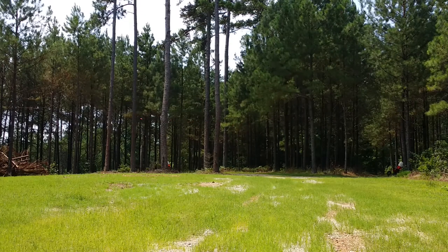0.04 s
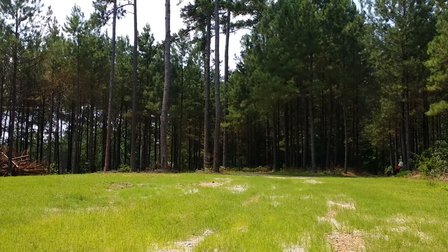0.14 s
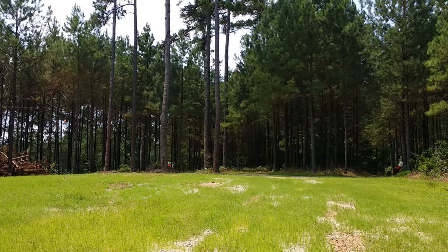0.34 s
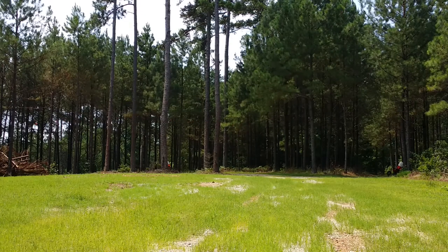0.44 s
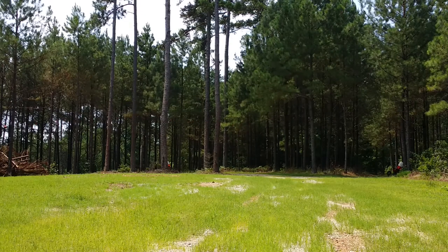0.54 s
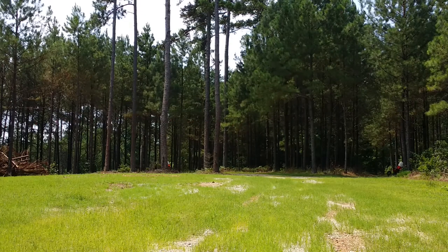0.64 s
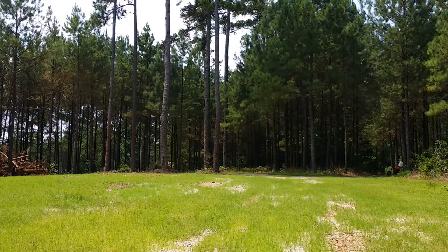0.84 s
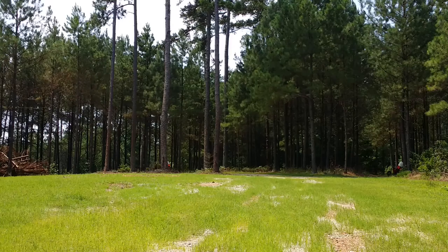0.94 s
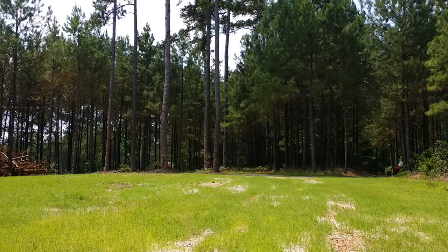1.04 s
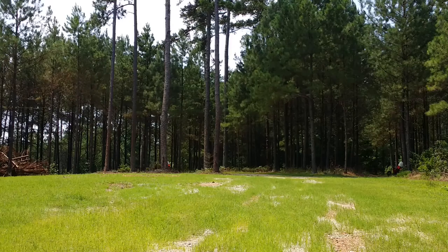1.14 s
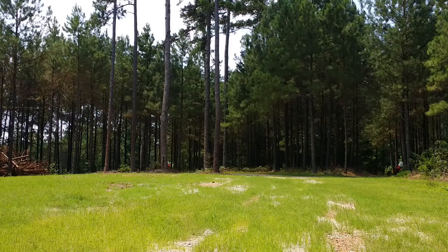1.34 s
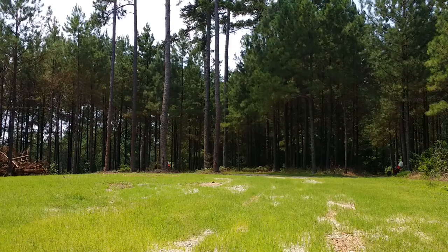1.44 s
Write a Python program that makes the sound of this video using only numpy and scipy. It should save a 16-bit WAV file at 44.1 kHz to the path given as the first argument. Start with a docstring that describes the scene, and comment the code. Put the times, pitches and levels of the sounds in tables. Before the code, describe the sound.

A single loud, close shotgun blast goes off at about 0.2 seconds over low outdoor background noise, a sharp crack with a low boom. A brief metallic clack follows at about 0.35 seconds. The shot echoes off the surrounding trees and fades over roughly a second. Faint crackle comes through from 0.7 seconds, and a few small clicks sound between 1 and 1.5 seconds as the background creeps back.

```python
"""One close shotgun blast in a grass clearing ringed by pines.
The crack comes with a low boom and a push of air. The ground and nearest trees scatter it, trunks
echo it, and a long wash returns from the wood. Metal clacks (probably the gun's action), then faint
crackle and small ticks follow. Gain control turns the outdoor background down at the shot and lets
it creep back while the ticks sound."""
import sys
import numpy as np
from scipy import signal
from scipy.fft import rfft, irfft
from scipy.io import wavfile
from scipy.ndimage import uniform_filter1d, minimum_filter1d

SR = 44100
rng = np.random.default_rng(int(sys.argv[2]) if len(sys.argv) > 2 else 0)


def int16_out(signal):
    """Quantize to a 16-bit WAV file."""
    q = np.round(np.clip(np.atleast_2d(signal).T, -1, 1) * 32767)
    wavfile.write(sys.argv[1], SR, q.astype(np.int16))


N = 66150
T, HZ = np.arange(N) / SR, np.fft.rfftfreq(N, 1 / SR)

# Tone colours of the noises. Each row: frequency in Hz, relative level in dB.
OUTDOOR_COLOUR = [(25, -55.5), (60, -44), (130, -29), (280, -19.5), (520, -15), (740, -18.5), (950, -26),
                  (1800, -28), (2700, -33.5), (3700, -40), (7000, -46), (10000, -60.5), (15000, -67.5)]
CRACK_COLOUR = [(30, -23), (100, -7), (260, -4), (700, -6.5), (1500, -2.5), (4000, -3), (8000, -1.5),
                (15000, -11)]
CLACK_COLOUR = [(200, -43.5), (1500, -22), (2700, -3), (5000, 0.5), (9000, -3), (15000, -6)]
CRACKLE_COLOUR = [(500, -24), (3000, -10), (7000, 5.5), (10000, -1), (15000, -6)]
TICK_COLOUR = [(60, -25), (300, 7), (1200, 8.5), (4300, 2.5), (7000, 3), (10000, -5.5), (15000, -10)]
HISS_COLOUR = [(30, -80), (70, -45.5), (130, -48), (400, -63), (15000, -71.5)]
# How the background and the crackle rise and fall. Each row: time in seconds, gain in dB.
OUTDOOR_GAIN = [(0, 0.5), (.12, -4), (.18, -6.5), (.21, -8), (1.1, -2), (1.28, -4), (1.38, -0.5),
                (1.5, -0.5)]
CRACKLE_GAIN = [(.6, -64), (.7, -36), (.95, -35), (1.06, -42), (1.15, -51.5), (1.26, -54), (1.33, -45.5),
                (1.4, -53), (1.5, -53)]
# Sound thrown back by ground and trees. Each row: frequency in Hz, relative levels in dB of the near
# scatter and of the far wash, the wash's fade time in seconds. A fade time (t60) is a fall of 60 dB.
TREE_BANDS = [(29.94, -33.5, -52.5, 1.1), (60, -17, -30, 0.99), (118, -12, -11.5, 1.5),
              (205, -20.5, -4.5, 1.23), (310, -6.5, -5, 1.26), (600, -1.5, -6, 1.47),
              (890, -12.5, -13.5, 1.91), (1408, -6, -12, 1.67), (2650, -6, -13, 1.38),
              (4000, -9, -12.5, 1.206), (8000, -8, -13, 0.99), (10800, -16, -19.5, 0.92),
              (12000, -7, -18, .85), (15000, -17, -28.5, .85)]
# Narrow resonances that colour scatter and wash. Each row: pitch in Hz, width in Hz, lift in dB.
RESONANCES = [(585, 16, 1.5), (1104, 22, 6.5), (1937, 20, 8.5), (1950, 25, 2), (2504, 22, 3.5),
              (2660, 49, 5.5), (2800, 16, 2.5), (3040, 18, 6.5), (3122, 5.3, 10.5), (3786, 18, -4.5),
              (4830, 75, 4.5), (4676, 13, 2), (5540, 13, 4.5), (6560, 40, 7), (6935, 16, 4.5),
              (7020, 100, 6), (7670, 140, 4.5), (9026, 16, 9.5)]
# Groups of trees answering. Each row: peak time in seconds, half-width in seconds, lift in dB.
WASH_SWELLS = [(0.502, 0.0344, 1.5), (0.643, 0.021, 0.5)]
# Tones of the boom and the steel. Each row: pitch in Hz, relative level in dB, fade time in seconds.
BOOM_TONES = [(104.67, -21, .085), (280, -12, 0.024), (584, -18, 0.065), (666.8, -14.5, 0.019),
              (1530, -18, 0.053)]
STEEL_TONES = [(2623, -30, 0.091), (7072, -24, 0.11), (7871, -20, .09), (12100, -32.5, .08),
               (12400, -27, .08)]
# Echoes from trunks and the tree line.
# Each row: start in seconds, relative level in dB, fade time in seconds, treble limit in Hz.
TREE_ECHOES = [(0.246, -5, 0.065, 9150), (0.255, -6, 0.09, 8450), (.2730, -5.5, 0.014, 2400),
               (0.2828, -3.5, .03, 1510), (.3025, -19, 0.013, 700), (0.317, -7, 0.15, 4000),
               (0.34, -3, 0.022, 461), (0.401, -10.5, 0.026, 2000), (0.48, -24.5, 0.056, 5960)]
# Clacks and ticks. Each row: start in seconds, relative level in dB, fade time in seconds,
# then the main resonance's pitch in Hz, width in Hz and lift in dB.
CLACK_HITS = [(.3498, -11, .025, 11950, 700, 20), (0.3544, -9, 0.062, 7620, 1000, 7)]
TICK_HITS = [(.9842, -19.5, 0.019, 1150, 1100, 12.5), (.9870, -27, 0.12, 4200, 398, 15),
             (1.0440, -27, 0.013, 7200, 1200, 11), (1.1842, -25.5, 0.018, 7600, 1500, 9),
             (1.2795, -31.5, 0.012, 6560, 600, 15), (1.2975, -29.5, 0.016, 13470, 3010, 7),
             (1.3868, -30.5, .016, 6990, 1200, 5), (1.4243, -32.5, 0.024, 4700, 790, 18.5),
             (1.4815, -36.5, .02, 4210, 1523, 3.5)]
# The two microphones. Each row: frequency in Hz, likeness (1 is the same wave), left minus right in dB.
MIC_PAIR = [(50.4, 0.48, 0.5), (146, 0.88, -2.5), (330, 1, -3.5), (648, 0.19, -3.5), (1000, -0.3, -2),
            (1350, -0.42, -2.5), (2675, 0.089, -3.5), (4500, -0.051, 1), (8200, 0, -2), (11800, 0, -1)]

SHOT_S, SHOT_GAIN_DB, CRACK_RISE_S = .2232, 20, .0038
BLAST_ALIKE, SCATTER_ALIKE = .21, .89  # share of the microphones' likeness that is kept


def amp(db):
    """Turn decibels into a gain."""
    return 10 ** (np.asarray(db) / 20)


def curve(points, column=1):
    """Spread a table's column over all frequencies, on a log scale."""
    table = np.array(points)
    return np.interp(np.log(HZ + 1), np.log(table[:, 0]), table[:, column])


def bump(hz, width_hz):
    """The shape of one resonance, 1 at its centre."""
    return 1 / (1 + (2 * (HZ - hz) / width_hz) ** 2)


def noise_spectrum(db, alike=1):
    """The spectrum of a coloured noise as the two microphones hear it."""
    left, other = rfft(rng.standard_normal((2, N)))
    likeness = np.clip(alike * curve(MIC_PAIR), -1, 1)
    right = likeness * left + np.sqrt(1 - likeness ** 2) * other
    balance_db = np.outer([.5, -.5], curve(MIC_PAIR, column=2))
    return np.array([left, right]) * amp(db + balance_db)


def noise(db, alike=1):
    """Coloured stereo noise as a wave."""
    return irfft(noise_spectrum(db, alike), N)


def wander(samples):
    """A smooth random wobble, typically 1 in size."""
    wobble = uniform_filter1d(uniform_filter1d(rng.standard_normal(N), samples), samples)
    return wobble / wobble.std()


def burst(start, rise, t60, hold=0):
    """Loudness that rises, holds and dies away; times are in seconds."""
    fading_s = np.maximum(T - start - rise - hold, 0)
    return np.clip((T - start) / rise, 0, 1) * np.exp(-np.log(1000) * fading_s / t60)


def ring(tones, start, rise, hold=0):
    """Dying sine waves, out of step between the microphones."""
    out = 0
    for hz, db, t60 in tones:
        likeness = np.clip(BLAST_ALIKE * np.interp(hz, HZ, curve(MIC_PAIR)), -1, 1)
        phase = 2 * np.pi * (hz * T + rng.random()) + np.array([[np.arccos(likeness)], [0]])
        out += amp(db) * burst(start, rise, t60, hold) * np.sin(phase)
    return out


def hits(rows, colour, rise, hold=0):
    """Brief contacts: bursts of noise, each with one main resonance."""
    return sum(noise(db + curve(colour) + lift_db * bump(hz, width)) * burst(start, rise, t60, hold)
               for start, db, t60, hz, width, lift_db in rows)


def background():
    """A low outdoor roar that slowly sinks and swells."""
    gain_db = np.interp(T, *np.transpose(OUTDOOR_GAIN)) + wander(samples=900)
    return noise(curve(OUTDOOR_COLOUR)) * amp(gain_db)


def crack():
    """The dense, harsh front of the muzzle blast."""
    return noise(curve(CRACK_COLOUR), BLAST_ALIKE) * burst(SHOT_S, CRACK_RISE_S, t60=.082, hold=.007)


def scatter(colour_db, length_s=.118):
    """The ground and nearest trees throw back a short, grainy rush."""
    rush = noise(colour_db + curve(TREE_BANDS), SCATTER_ALIKE) * amp(-wander(samples=40))
    ending = .5 - .5 * np.tanh((T - SHOT_S - length_s) / .012)
    return rush * burst(SHOT_S, rise=.0068, t60=.98) * ending


def wash(colour_db, flicker_db=.95):
    """The wood's long answer, each band of pitch dying at its own speed."""
    spectrum = noise_spectrum(colour_db + curve(TREE_BANDS, column=2))
    tail = 0
    for hz, _, _, t60 in TREE_BANDS:
        band = curve([(row[0], row[0] == hz) for row in TREE_BANDS])  # 1 at this row, 0 at the others
        tail += irfft(spectrum * band, N) * burst(SHOT_S, rise=.055, t60=t60)
    swell_db = sum(db * np.exp(-((T - peak) / width) ** 2) for peak, width, db in WASH_SWELLS)
    return tail * amp(swell_db + flicker_db * wander(samples=160))


def boom():
    """Short, mostly low resonances give the blast its punch."""
    return ring(BOOM_TONES, start=.2275, rise=.005, hold=.003)


def air_push(start_s=.2346, swing_s=.0016, band_hz=(65, 700)):
    """One swing of air pressure and its rebound, stronger on the right."""
    age = np.maximum(T - start_s, 0) / swing_s
    pressure = (T > start_s) * (age - 1) * np.exp(-age)
    band = signal.butter(2, band_hz, "band", fs=SR, output="sos")
    return amp([[-12], [-3.5]]) * signal.sosfilt(band, pressure)


def echoes(bass_limit_hz=220):
    """Trunks and the tree line return the blast as short, duller bursts."""
    bass_loss_db = 10 * np.log10(1 + (bass_limit_hz / (HZ + 1)) ** 4)
    out = 0
    for start, db, t60, top_hz in TREE_ECHOES:
        treble_loss_db = 10 * np.log10(1 + (HZ / top_hz) ** 4)
        out += noise(db - bass_loss_db - treble_loss_db) * burst(start, CRACK_RISE_S, t60)
    return out


def metal_clack(rise_s=.00077):
    """A double clack that leaves the steel ringing."""
    clacks = hits(CLACK_HITS, CLACK_COLOUR, rise_s, hold=.0017)
    return clacks + ring(STEEL_TONES, start=CLACK_HITS[0][0], rise=rise_s)


def crackle(per_second=450, spread_db=4.5, t60=.014):
    """Tiny random pops that come through as the wash fades."""
    sizes = amp(spread_db * np.minimum(rng.exponential(1, N), 3))
    pops = sizes * (rng.random(N) < per_second / SR)
    grains = signal.lfilter([1], [1, -np.exp(-np.log(1000) / (t60 * SR))], pops)  # each pop dies away
    grains /= np.sqrt(np.mean(grains ** 2))
    gain_db = np.interp(T, *np.transpose(CRACKLE_GAIN), left=-np.inf)
    return noise(curve(CRACKLE_COLOUR)) * grains * amp(gain_db)


def ticks():
    """Small knocks, perhaps the spent shell and handling."""
    return hits(TICK_HITS, TICK_COLOUR, rise=.0012)


def gain_control(level_of, limit_db=-13.5, max_cut_db=23, hold_s=.72, recover_db_per_s=14.5):
    """A gain that drops when the sound is loud, stays down, then creeps back."""
    power = uniform_filter1d((level_of ** 2).mean(0), size=200)
    level_db = 10 * np.log10(abs(power) + 1e-12)
    gain_db = -np.clip(level_db - limit_db, 0, max_cut_db)
    ahead, half_hold = int(.002 * SR), int(hold_s * SR) // 2
    gain_db = minimum_filter1d(gain_db, 2 * ahead + 1)  # drop just before the peak
    held_db = minimum_filter1d(gain_db, 2 * half_hold + 1, origin=half_hold, mode="nearest")
    climb_db = recover_db_per_s * T
    gain_db = np.minimum.accumulate(held_db - climb_db) + climb_db  # limit how fast it returns
    return amp(uniform_filter1d(gain_db, ahead + 1))


def scene():
    """The shot and the trees' answer, with ticks, crackle and background."""
    resonance_db = sum(db * bump(hz, width) for hz, width, db in RESONANCES) - 1.5
    blast = crack() + boom() + air_push()
    reflections = scatter(resonance_db) + wash(resonance_db) + echoes()
    shot = amp(SHOT_GAIN_DB) * (blast + reflections + metal_clack())
    return shot + ticks() + crackle() + background()


def record(dry, top_hz=15350):
    """Apply gain control, add steady electronic hiss, round off peaks and cut the highest treble."""
    ducked = dry * gain_control(level_of=dry) + noise(curve(HISS_COLOUR))
    rounded = ducked / (1 + ducked ** 6) ** (1 / 6)
    low_pass = signal.firwin(255, top_hz, window=("kaiser", 8), fs=SR)
    return signal.oaconvolve(rounded, low_pass[None], "same")


dry = scene()
out = record(dry)
int16_out(out)
```